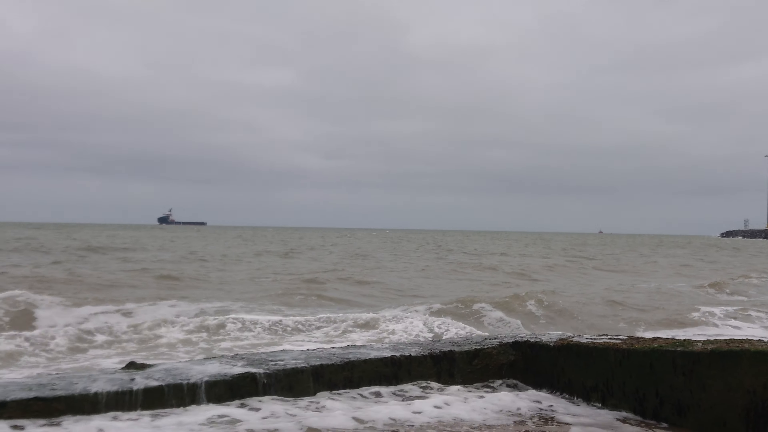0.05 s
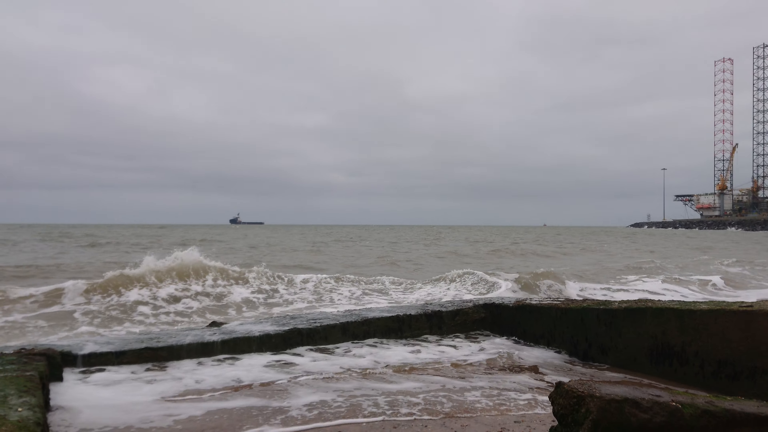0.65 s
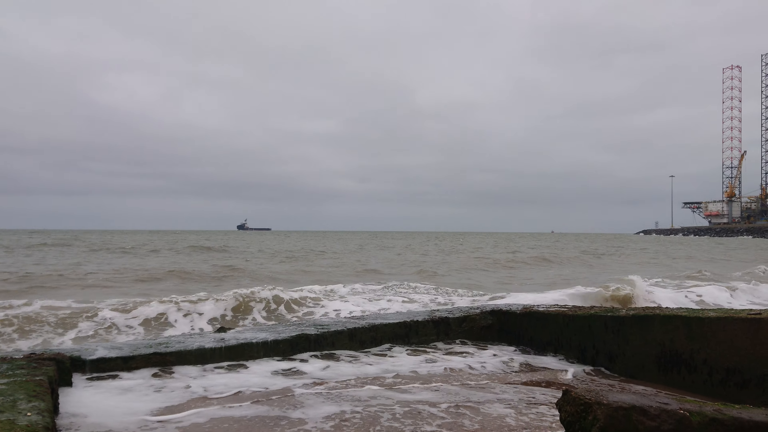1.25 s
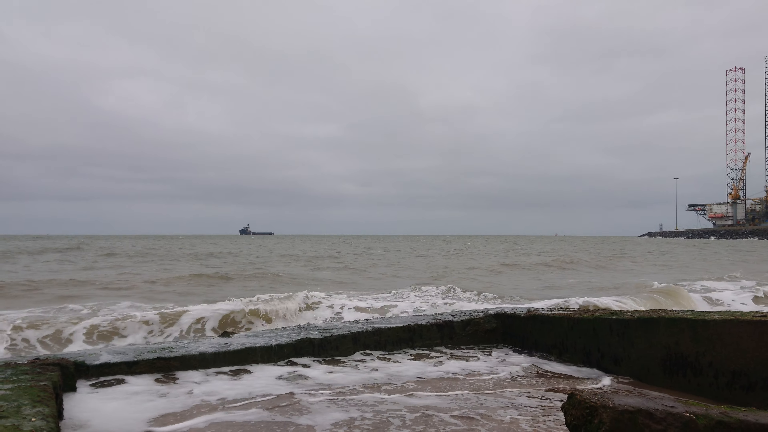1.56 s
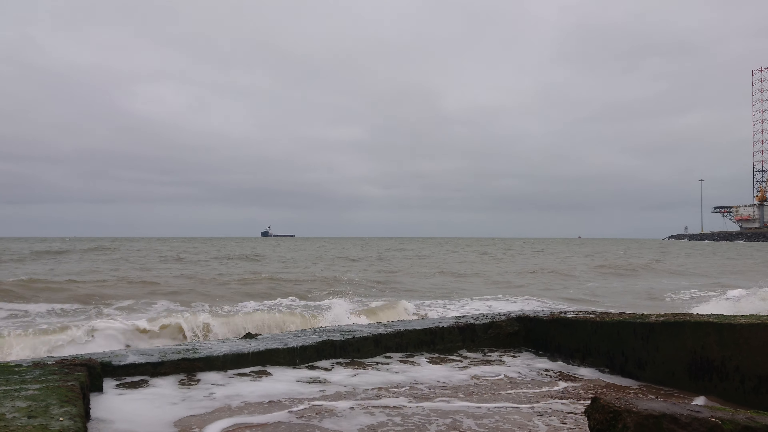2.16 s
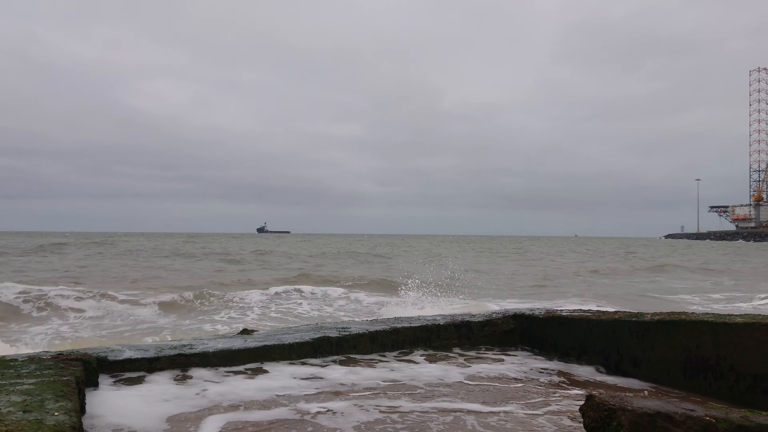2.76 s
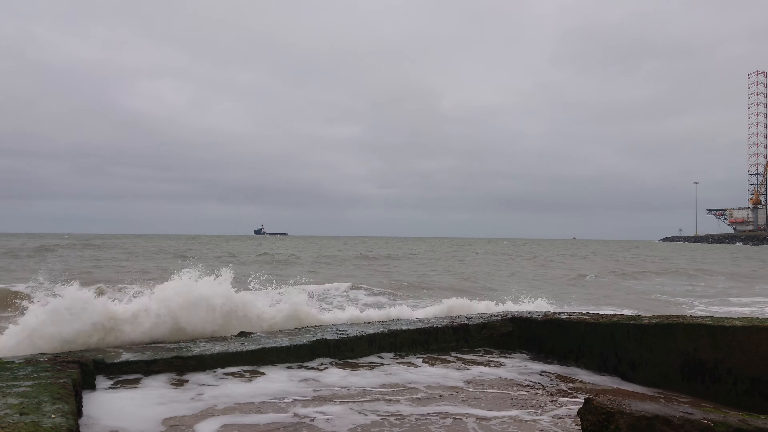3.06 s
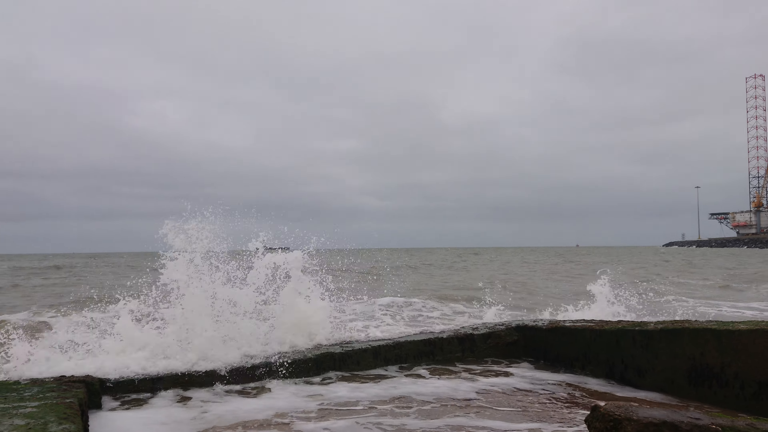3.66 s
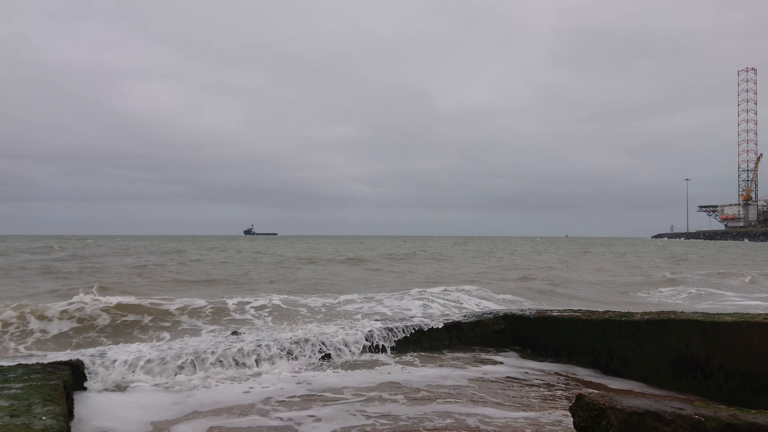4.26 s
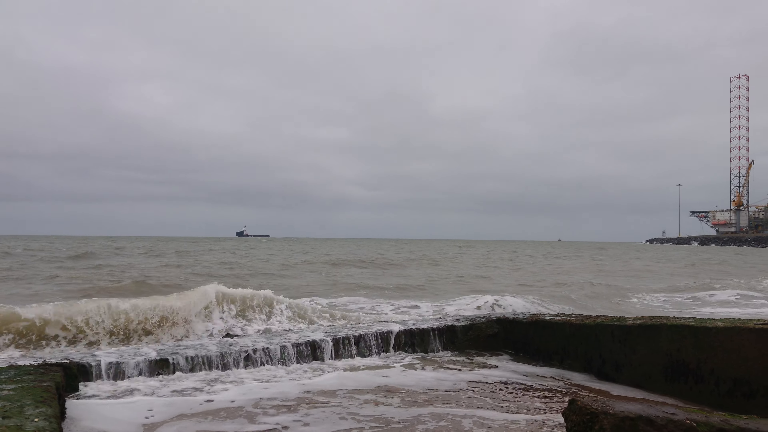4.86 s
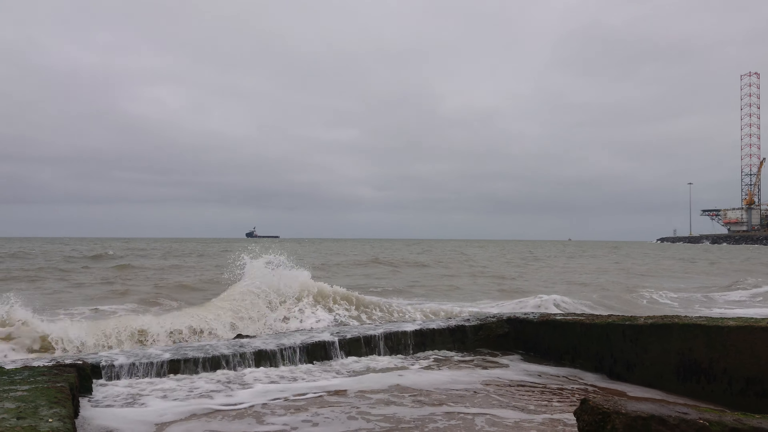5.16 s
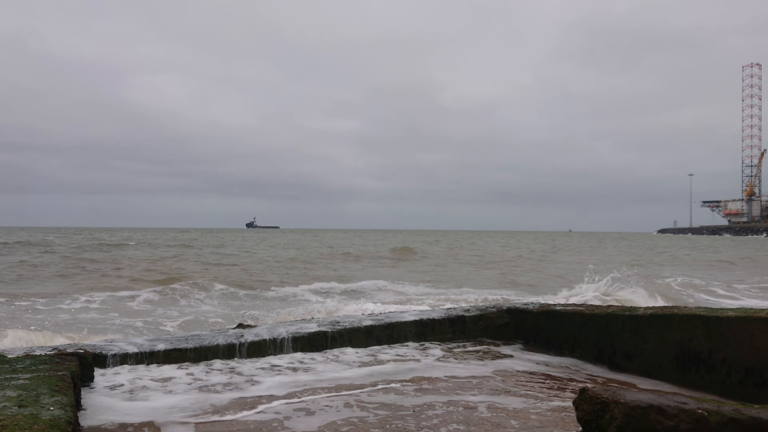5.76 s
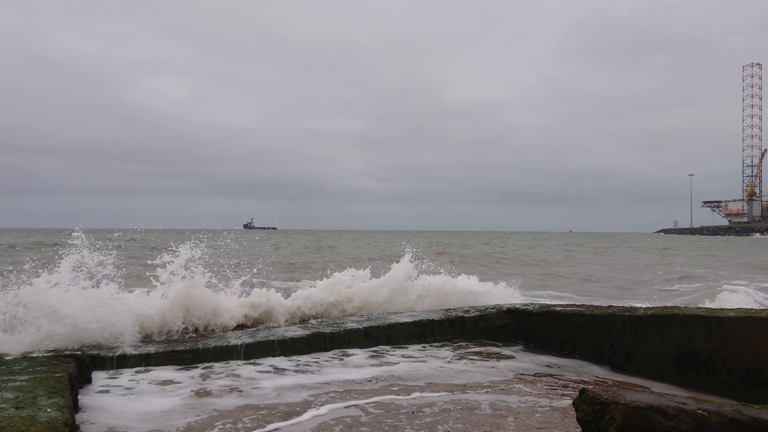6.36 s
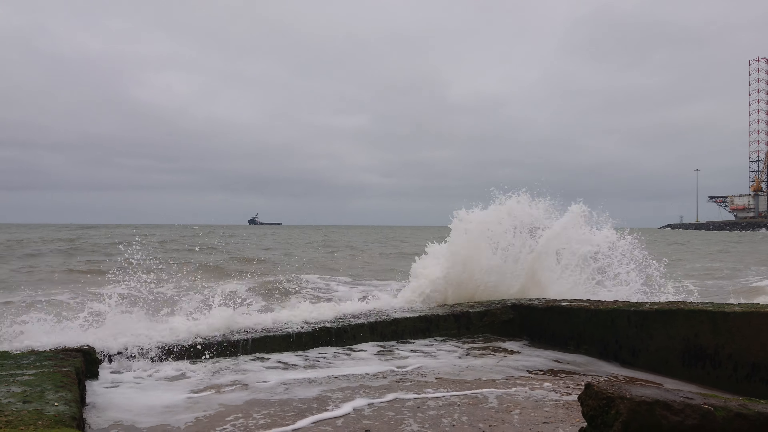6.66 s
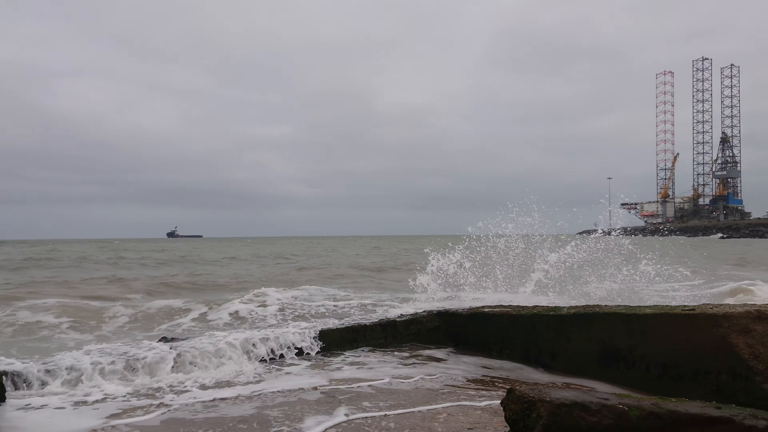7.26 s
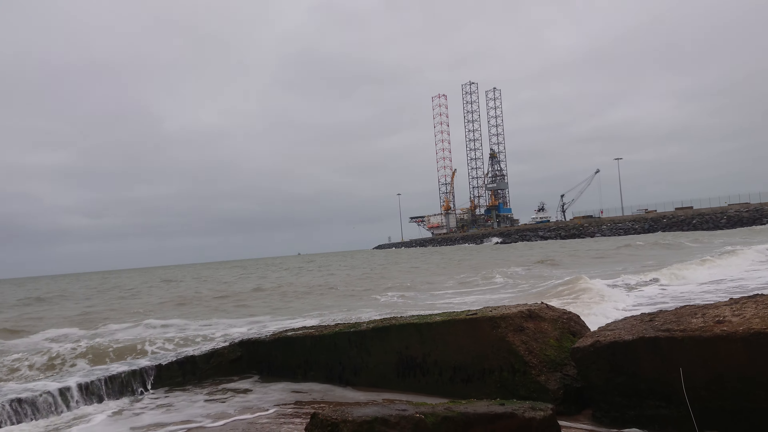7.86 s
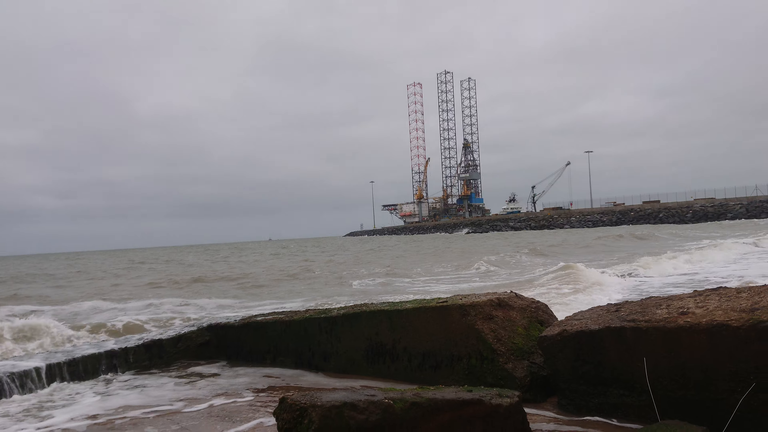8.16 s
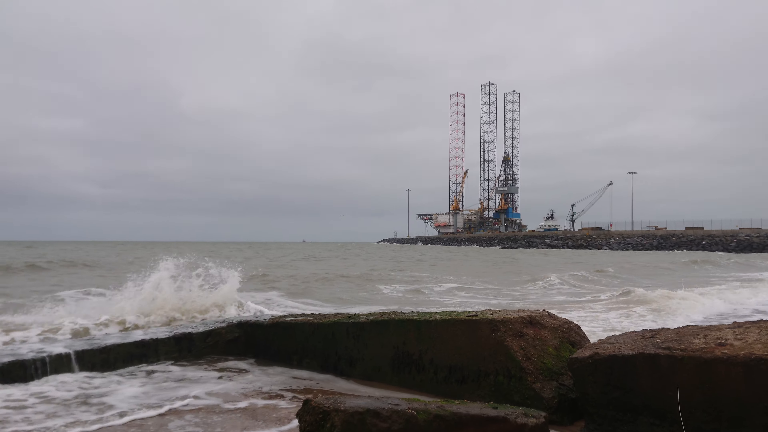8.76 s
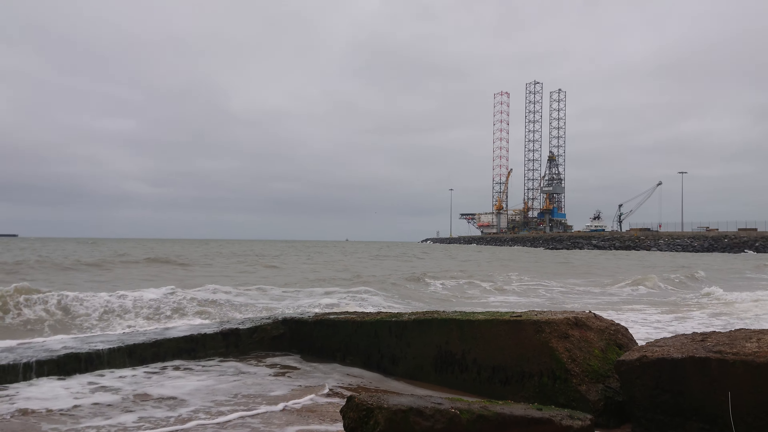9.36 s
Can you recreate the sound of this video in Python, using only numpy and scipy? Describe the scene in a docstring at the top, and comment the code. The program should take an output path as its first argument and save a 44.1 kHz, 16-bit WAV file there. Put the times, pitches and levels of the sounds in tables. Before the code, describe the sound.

Rough surf washes against a low seawall on a windy beach. Gusts rumble and thump on a hand-held microphone throughout, hardest on the left, while waves roar and leave fizzing foam, louder on the right. A drop ticks on the microphone, then several waves throw splashing spray, the biggest with two dull slaps. The fizz grows on the right, and faint handling knocks and clicks come near the end.

```python
"""Rough surf runs against a low seawall on a windy beach. From the start, gusts buffet the two ports of a
hand-held microphone, the left hardest, while waves roar, burst into spray and leave fizzing foam, louder
on the right. A drop of spray ticks on the housing at 2.3 s, and from 3.6 s sheets of spray splash down.
Two dull slaps come at 6.5 s, then the microphone turns toward the foam and the fizz rises on the right.
Near the end the housing knocks and clicks in the hand."""
import sys
import numpy as np
from scipy import signal
from scipy.fft import rfft, irfft
from scipy.io import wavfile
from scipy.ndimage import uniform_filter1d, map_coordinates

SR = 44100
rng = np.random.default_rng(int(sys.argv[2]) if len(sys.argv) > 2 else 0)


def generate_wav(sig):
    """Save sig (samples, or channels by samples) to the path in sys.argv[1] as 16-bit PCM at SR."""
    pcm = np.round(np.clip(np.atleast_2d(sig).T, -1, 1) * 32767).astype(np.int16)
    wavfile.write(sys.argv[1], SR, pcm)


N = 423360

# the bed of wind, around its usual strength: (time [s], left flow [dB], right flow [dB])
BREEZE = [(0.0, -7, -1.0), (1.1, -4.5, -2), (2.0, -4, 1), (2.8, -4.5, 1.0), (3.45, -0.5, -7.5),
          (4.1, -5.0, -7.5), (4.7, -3.5, -4.5), (5.7, 1, -5), (6.7, 3, 1.5), (7.28, -2, -7.5),
          (7.7, -2.5, 1), (8.2, -2, 1), (8.8, 2.5, -1.5), (9.2, -4.5, 1.5), (9.6, -4.5, 2.5)]
# gusts (+) and lulls (-) riding on it: (middle [s], length [s], left flow [dB], right flow [dB])
GUSTS = [(0.332, .2, -6, 0), (0.579, 0.081, -7, -2), (0.88, .38, -1, 4.5), (1.231, 0.26, 4, 2),
         (1.591, 0.26, 5, 0), (1.836, 0.17, 4, 2), (2.33, 0.32, 7.5, 6.5), (3.107, 0.4, 4.5, 0),
         (3.951, 0.26, -11, 0), (4.29, .2, 4, 1), (4.409, .14, -6, 0), (4.999, 0.19, 7.5, -1),
         (5.21, .12, -8, 2), (5.53, 0.48, 3, 7.5), (5.683, .14, 1.5, -9), (6.17, .3, 1.5, -4),
         (6.998, 0.33, 4.5, 0), (7.66, 0.47, 5, 8.5), (8.055, 0.064, -9, 0), (8.245, .12, -17, -1),
         (8.38, .16, 3, 6), (9.462, 0.15, -7, -9)]
# bite, the extra eddy speed from the wind's angle: (time [s], left speed [dB], right speed [dB])
BITE = [(0, -1.5, -0.08), (1.7, -0.3459, 1.29), (2.3, 0.5, 0.1), (3.6, -0.33, 0.32), (5.2, -1.14, -0.95),
        (5.5, 1.2, 0.58), (6.2, 0.05, -0.03), (7.7, 1.83, 0.3), (8.6, -0.04, 1.23), (9.6, -1.76, -.5)]
# eddy rumble at each port in the usual wind: (frequency [Hz], level [dB per Hz])
EDDIES_LEFT = [(50, -33), (90, -32), (140, -36.5), (210, -43), (320, -50), (500, -61.5), (800, -77),
               (1500, -102), (4000, -130)]
EDDIES_RIGHT = [(50, -44), (100, -48), (200, -56), (320, -62), (500, -70.5), (800, -87.5), (1500, -99),
                (4000, -125)]
# large eddies thumping on each port: (time [s], length [s], flow above the gust [dB])
BUFFETS_LEFT = [(0.06, 0.041, 8.0), (0.18, 0.078, 3.5), (0.45, 0.034, 10), (0.6, 0.07, 4),
                (0.835, 0.015, 4), (0.897, 0.025, 5.5), (1.15, 0.067, 2.5), (1.487, 0.031, 5),
                (1.97, 0.055, 3), (2.147, 0.059, 7), (2.35, 0.06, 4), (2.51, 0.079, 5.0), (2.69, 0.098, 5),
                (2.835, 0.12, 6.0), (3.04, 0.055, 3.5), (3.89, 0.019, 5), (4.085, 0.095, 6),
                (4.277, 0.044, 3.5), (4.47, 0.037, 6.0), (4.627, 0.11, 4.5), (4.785, 0.019, 6),
                (5.02, 0.057, 3.5), (5.115, 0.0413, 4.5), (6.343, 0.025, 5.0), (6.59, 0.05, 3),
                (7.487, 0.046, 2.5), (7.94, 0.091, 3.5), (8.09, 0.11, 3), (8.66, 0.039, 4),
                (8.82, 0.062, 4), (9.04, 0.09, 5), (9.26, 0.072, 6.0), (9.397, 0.03, 5.5)]
BUFFETS_RIGHT = [(0.08, 0.028, 8.0), (0.262, 0.0252, 6), (0.74, 0.075, 2.5), (0.92, 0.023, 5),
                 (1.33, 0.06, 4), (1.647, 0.06, 3.5), (1.77, 0.042, 5), (2.12, 0.031, 6),
                 (2.727, 0.026, 8.5), (4.34, 0.055, 8), (4.465, 0.039, 7), (4.83, 0.076, 4.5),
                 (5.1, 0.22, 5), (5.84, 0.032, 8), (6.005, 0.025, 10.5), (6.39, 0.08, 6.0),
                 (6.553, 0.12, 3.5), (6.785, 0.019, 6), (7.413, 0.11, 3.5), (7.655, 0.042, 5),
                 (7.945, 0.02, 7), (8.69, 0.047, 6.5), (9.03, 0.14, 4)]
# the tone of the sea at each port: (frequency [Hz], level [dB per Hz])
SEA_LEFT = [(100, -80.5), (500, -71), (1000, -86.5), (1500, -91.5), (2300, -99), (2850, -99), (3200, -103),
            (5200, -103), (6300, -116), (7500, -127), (9100, -127), (10800, -107), (13500, -102),
            (15700, -92)]
SEA_RIGHT = [(100, -67.5), (500, -67.5), (1150, -78.5), (2150, -83.5), (2620, -93), (3100, -84.5),
             (4100, -84.5), (5700, -90.5), (6800, -99), (7600, -116), (8900, -112), (9900, -102.3),
             (13000, -104.4), (15700, -110)]
# how alike the ports hear the sea: (frequency [Hz], correlation [0-1])
SEA_LIKENESS = [(500, 0), (2000, .35), (3100, 0.1), (5000, 0.8), (6500, 0), (12000, .05)]
# the wash between waves, as rides that sea() scales per port: (time [s], roar [dB], spray [dB], fizz [dB])
WASH = [(0, -5, 2, -3), (1.3, -2.5, 3.5, 1), (2.85, 2, 6, 0.5), (3.4, 1, 0.5, -2), (4.4, 1, -2.5, -2),
        (5.05, -1.5, -4, -4), (5.9, 0.5, 3, -1.5), (6.4, -2, 0, -0.5), (7.15, -2.5, 0.5, 0),
        (7.55, 1.5, -1, -1), (8.15, -3, -3, -2), (9.6, -1.6, 2, -0.5)]
# waves breaking on the wall, added to those rides:
# (time [s], length [s], roar [dB], spray [dB], fizz [dB], fizz left minus right [dB])
WAVES = [(0.0, 0.096, 4.5, 6, 3, -4), (1.43, 0.37, 4, 2.5, 4, -1), (1.901, 0.76, 4.5, 1.5, 3, 0),
         (3.54, 0.6, 3.5, 6, 8.5, 0), (5.422, 0.19, 2, -1.5, 3, 2), (6.47, 0.45, 7.5, 4.5, 6, 0),
         (8.416, 0.48, 1, 2, 0.8, -2.5), (8.946, 0.08, 1, 0, 2.5, 0), (9.46, 0.2, 5, 8, 2.5, 6)]
# fresh foam sizzling up: (peak [s], half length [s], level [dB])
SIZZLES = [(.05, 0.38, -3), (.95, 0.58, -4.5), (1.63, 0.17, -1), (3.82, .17, -4), (8.98, .12, -3),
           (9.52, .06, 0)]
# its bright hiss: (frequency [Hz], level [dB per Hz])
SIZZLE_HISS = [(2800, -108), (4000, -78.5), (5400, -84), (6400, -104), (7500, -122)]
# small, tight eddies thudding into each port: (time [s], level [dB])
THUDS_LEFT = [(0.256, -17), (0.472, -17), (0.721, -13.5), (1.213, -12), (1.566, -12), (1.819, -12),
              (2.155, -6), (2.198, -12), (2.36, -13), (2.403, -5), (2.877, -9), (3.059, -8), (3.177, -11),
              (3.457, -9), (4.576, -13), (4.632, -13), (5.479, -9.5), (6.42, -12), (6.756, -8),
              (7.985, -11), (8.504, -7)]
THUDS_RIGHT = [(1.799, -8), (2.458, -10), (2.737, -10), (7.531, -13), (7.681, -10.5), (7.791, -4),
               (7.821, -13.5), (8.126, -13), (9.301, -10)]
# a drop of spray landing by the right port: (time [s], strike level [dB])
DROPS = [(2.305, -5.5)]
# sheets of spray coming down by the wall: (peak [s], half length [s], level [dB])
SPLASHES = [(3.6, 0.089, 0), (3.783, 0.14, 1), (4.07, 0.094, -1), (5.532, 0.12, 1.5), (6.62, 0.2, 2),
            (6.94, 0.16, 0)]
# their narrow hiss: (frequency [Hz], level [dB per Hz])
SPLASH_HISS = [(1500, -115), (2700, -84.5), (3100, -79.5), (3600, -77), (4400, -90.5), (7000, -115)]
# short slaps on the right: (time [s], level [dB])
SLAPS = [(6.503, 4.5), (6.599, -4)]
# their dull tone: (frequency [Hz], level [dB per Hz])
SLAP_COLOUR = [(100, -53), (600, -51.5), (1650, -66.5), (2800, -89), (7000, -115)]
# EQ on the right port once it faces the foam: (frequency [Hz], gain [dB])
TURN_EQ = [(1500, 1), (2050, 1.5), (2900, 0), (4200, 0.5), (5400, 1), (7000, -3.5), (10500, -1),
           (12000, 2.5)]
# soft knocks by the right port: (time [s], strike level [dB])
KNOCKS = [(8.4395, -33.5), (8.452, -39)]
# their ring: (frequency [Hz], gain [dB], t60 [s])
KNOCK_MODES = [(1341, 2, 0.017), (1720, 1, 0.014), (2120, 2, .02)]
# clicks of the housing: (time [s], left strike level [dB], right strike level [dB])
CLICKS = [(9.304, -27, -27), (9.3174, -19, -17), (9.5093, -23, -16.5), (9.5346, -33.5, -26)]
# the ring of its plastic shell: (frequency [Hz], gain [dB], t60 [s])
SHELL_MODES = [(1297, 5, 0.0026), (1683, -1, 0.0032), (2666, -4.5, 0.0043), (3500, -26, .003)]

TIME, FREQS = np.arange(N) / SR, np.fft.rfftfreq(N, 1 / SR)


def from_db(db):
    """Decibels to gain."""
    return 10 ** (np.asarray(db) / 20)


def in_time(rows):
    """One automation lane per column, in straight lines between the points."""
    times, *columns = np.transpose(rows)
    return [np.interp(TIME, times, column) for column in columns]


def hump(middle_s, length_s):
    """A smooth swell from 0 to 1 and back."""
    return np.cos(np.pi * np.clip((TIME - middle_s) / length_s, -.5, .5)) ** 2


def ramp(start_s, length_s):
    """A smooth fade from 0 to 1."""
    part = np.linspace(0, 1, 17)
    return np.interp(TIME, start_s + length_s * part, np.sin(np.pi / 2 * part) ** 2)


def held(time_s, length_s, attack_s, fade_s):
    """An envelope that rises around time_s, holds and releases."""
    return ramp(time_s - attack_s / 2, attack_s) * (1 - ramp(time_s + length_s, fade_s))


def butter(x, hz, kind, order=2):
    """A causal Butterworth filter."""
    return signal.sosfilt(signal.butter(order, hz, kind, fs=SR, output="sos"), x)


def drift(rate):
    """A random wobble of spread 1 that moves about `rate` times a second."""
    spectrum = rfft(rng.standard_normal(N))
    wobble = irfft(spectrum * FREQS / (FREQS + rate / 10) / (1 + (FREQS / rate) ** 2), N)
    return wobble / wobble.std()


def colour(white, spectrum):
    """Shapes white noise of rms 1 to a spectrum in dB per Hz."""
    hz, level_db = np.transpose(spectrum)
    curve_db = np.interp(np.log(FREQS + 1), np.log(hz), level_db)
    return irfft(rfft(white) * from_db(curve_db), N) * np.sqrt(SR / 2)


def strikes(times, levels_db):
    """One impulse at each time."""
    out = np.zeros(N)
    out[np.round(times * SR).astype(int)] = from_db(levels_db)
    return out


def puffs(times, sizes, fade_s):
    """Pulses that rise within milliseconds and die away."""
    hits = np.bincount(np.round(times * SR).astype(int), sizes, N)
    tails = signal.lfilter([1], [1, -np.exp(-1 / (fade_s * SR))], hits)
    return butter(tails, 140, "low")


def ring(hits, hz, t60):
    """A unit impulse sets off a decaying sine of height 1."""
    decay, step = np.exp(-np.log(1000) / (t60 * SR)), 2 * np.pi * hz / SR
    return signal.lfilter([0, np.sin(step)], [1, -2 * decay * np.cos(step), decay ** 2], hits + 1e-18)


def resonate(hits, modes):
    """A struck body rings in all its modes, in alternating polarity."""
    return sum(from_db(db) * ring(hits, hz, t60) * (-1) ** k for k, (hz, db, t60) in enumerate(modes))


def wind(flow_db, bite_db, eddies, lumps, flutter, push, hurry, steadying):
    """Faster air presses harder (push) and sweeps eddies by sooner (hurry): gusts are loud and bright."""
    turbulence_db = sum(depth_db * drift(rate) for depth_db, rate in (lumps, flutter))
    turbulence_db *= from_db(-steadying * flow_db)  # light air is fitful, a strong blow is steadier
    flow_db = flow_db + 7 * np.tanh(turbulence_db / 7)  # swings by 7 dB at most
    travelled = np.cumsum(from_db(hurry * flow_db + bite_db))
    rumble = colour(rng.standard_normal(N), eddies)
    power = uniform_filter1d(butter(rumble, 50, "high") ** 2, size=SR // 12, mode="wrap")
    rumble *= (power.mean() / power) ** .3  # compressed into a nearly unbroken stream
    swept = map_coordinates(rumble, [travelled % (N - 1)], order=3, mode="wrap")
    return from_db(push * flow_db) * swept


def buffets(rows, attack_s=0.0097, fade_s=.025, kick=.4):
    """Each large eddy hits a port with a kick, presses for a moment and slides off; extra flow in dB."""
    times, _, flows_db = np.transpose(rows)
    pressing_db = sum(db * held(s, length_s, attack_s, fade_s) for s, length_s, db in rows)
    return pressing_db + puffs(times, kick * flows_db, attack_s)


def waves():
    """Waves fold over fast and drain a little slower; rides for roar, spray, left and right fizz."""
    roar, spray, fizz = in_time(WASH)
    pan = -1.5  # dB left minus right: the foam of the wash sits a little to the right
    for s, length_s, roar_db, spray_db, fizz_db, pan_db in WAVES:
        breaking = held(s, length_s, attack_s=0.18, fade_s=0.2)
        roar, spray = roar + roar_db * breaking, spray + spray_db * breaking
        fizz, pan = fizz + fizz_db * breaking, pan + pan_db * breaking
    return roar, spray, fizz + pan / 2, fizz - pan / 2


def bubbles(per_s_at_1khz=120, size_db=3.0, cycles=7.6, near_share=0.23, churn_db=1.14):
    """Near bubbles and droplets ring a few cycles over the rush of countless far ones; roughly white."""
    edges_hz = np.geomspace(90, 16000, 17)
    white, out, surge = rng.standard_normal((2, N)), np.zeros(N), drift(15)
    for k, (low, high) in enumerate(zip(edges_hz, edges_hz[1:])):
        rush = butter(white[k % 2], [low, high], "band")
        grains = np.zeros(N)
        for hz in np.geomspace(low, high, 5)[1::2]:
            count = int(per_s_at_1khz * np.sqrt(hz / 1000) * N / SR) + 1  # more small than large
            when, size, sign = rng.random((count, 3)).T
            pops = from_db(-size_db * np.log(np.maximum(size, .01))) * np.sign(sign - .5)
            grains += ring(np.bincount((when * N).astype(int), pops, N), hz, cycles / hz)
        grains = butter(grains, low / 2, "high")
        band = np.sqrt(1 - near_share) * rush + np.sqrt(near_share) * grains * rush.std() / grains.std()
        out += band * from_db(churn_db * (0.37 * surge + drift(8.9)))
    return out


def wide_water(lag_s=.00051):
    """The right port hears its own stretch of surf and, a moment late, some of the left one's."""
    left, own = bubbles(), bubbles()
    alike = np.interp(FREQS, *np.transpose(SEA_LIKENESS))
    late = rfft(left) * np.exp(-2j * np.pi * FREQS * lag_s)
    return left, irfft(alike * late + np.sqrt(1 - alike ** 2) * rfft(own), N)


def surf(texture, spectrum, roar_db, spray_db, fizz_db, crossovers_hz):
    """Four bands, low to high: big bubbles roar, falling spray hisses, foam fizzes, finest foam on top."""
    water = rfft(colour(texture, spectrum))
    lowpasses = [1 / (1 + (FREQS / hz) ** 10) for hz in crossovers_hz]
    bands = np.diff(lowpasses, axis=0, prepend=0, append=1)
    rides_db = [roar_db, spray_db, fizz_db, 1.35 * fizz_db]  # the finest foam swells most when fresh
    return sum(irfft(water * band, N) * from_db(db) for band, db in zip(bands, rides_db))


def sea(turned, turn_fizz_db=5):
    """The waves play on the surf at both ports; the right gains fizz as it turns toward the foam."""
    roar, spray, fizz_left, fizz_right = waves()
    fizz_right += turn_fizz_db * turned
    left, right = wide_water()
    return np.array([
        surf(left, SEA_LEFT, 0.76 * roar, .4 * spray + 0.74 * fizz_left, fizz_left, (2500, 8000, 14200)),
        surf(right, SEA_RIGHT, roar, 0.73 * spray, fizz_right, (1600, 4840, 14200))])


def foam_and_spray(rows, hiss, patter_db):
    """Fresh foam or thrown water rises and falls in swells of pattering hiss."""
    swell = sum(from_db(db) * np.exp(-((TIME - s) / half_s) ** 2) for s, half_s, db in rows)
    patter = rng.standard_normal(N) * from_db(patter_db * drift(150))
    return swell * colour(patter, hiss)


def thuds(rows, hz=396, t60=0.014):
    """Each tight eddy pushes or pulls at a port: one heavily damped swing at a pitch of its own."""
    chance = rng.uniform(-1.2, 1, (len(rows), 2))
    swings = sum(np.sign(polarity) * ring(strikes(s, db), hz * from_db(2 * detune), t60)
                 for (s, db), (detune, polarity) in zip(rows, chance))
    return butter(swings, 1000, "low", order=4)


def drop():
    """A landing drop is one bright, dry tick, scooped out where the port is deaf."""
    tick = butter(strikes(*np.transpose(DROPS)), 1800, "high")
    hollow = butter(tick, [6300, 10200], "bandstop")
    return butter(hollow, 4500, "low", order=1)


def slaps():
    """Dull bursts of noise that start at once and are gone in a few hundredths of a second."""
    times, levels_db = np.transpose(SLAPS)
    return puffs(times, from_db(levels_db), fade_s=0.013) * colour(rng.standard_normal(N), SLAP_COLOUR)


def face_foam(water, turned):
    """The sea's tone shifts as the port swings round to face the foam."""
    eq_db = np.interp(FREQS, *np.transpose(TURN_EQ))
    faced = irfft(rfft(water) * from_db(eq_db), N)
    return water + turned * (faced - water)


def knocks():
    """A padded knock and its rebound give the housing a dull ring."""
    taps = butter(strikes(*np.transpose(KNOCKS)), 2600, "low", order=4)
    return resonate(taps, KNOCK_MODES)


def housing_clicks():
    """Short clicks ring the plastic shell by both ports, under a thin, hard edge."""
    times, *sides_db = np.transpose(CLICKS)
    hits = np.array([strikes(times, side_db) for side_db in sides_db])
    shell = resonate(butter(hits, 5200, "low", order=4), SHELL_MODES)
    edge = butter(hits, 12000, "high", order=4)
    return shell + from_db(-8) * edge


def scene():
    """The stereo mix: each port has its own wind and its own share of the wide sea."""
    gusts_db = sum(np.outer(sides_db, hump(s, length_s)) for s, length_s, *sides_db in GUSTS)
    flow_left, flow_right = np.array(in_time(BREEZE)) + gusts_db
    bite_left, bite_right = in_time(BITE)
    air = np.array([  # lumps and flutter: (flow depth in the usual wind [dB], rate [Hz])
        wind(flow_left + buffets(BUFFETS_LEFT), bite_left, EDDIES_LEFT,
             lumps=(1.9652, 27.6), flutter=(2.0, 77.0), push=0.63, hurry=.34, steadying=0.349),
        wind(flow_right + buffets(BUFFETS_RIGHT), bite_right, EDDIES_RIGHT,
             lumps=(1.48, 17.96), flutter=(2.5, 75.8), push=0.76, hurry=.3, steadying=0.079)])
    air += [thuds(THUDS_LEFT), thuds(THUDS_RIGHT)]
    turned = ramp(start_s=7.115, length_s=0.55)
    water = sea(turned)
    water[1] = face_foam(water[1], turned)
    water *= from_db(-4 * hump(middle_s=5.72, length_s=0.33))  # the sea dips briefly after one wave
    splashes = foam_and_spray(SPLASHES, SPLASH_HISS, patter_db=1.5)
    sizzles = foam_and_spray(SIZZLES, SIZZLE_HISS, patter_db=1.3)
    mix = air + water + housing_clicks()
    mix[1] += sizzles + drop() + splashes + slaps() + knocks()  # hard right
    return mix


def record(dry):
    """The microphone sheds the deepest rumble, rounds the peaks and cuts the top; the ends are soft."""
    x = butter(dry, 51.2, "high", order=6)
    x = x / (1 + (x / .97) ** 4) ** .25  # soft clip
    x = x * signal.windows.tukey(N, .001)
    return signal.sosfilt(signal.ellip(12, .1, 80, 15800, fs=SR, output="sos"), x)


dry = scene()
out = record(dry)
generate_wav(out)
```